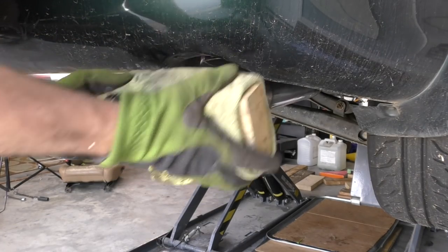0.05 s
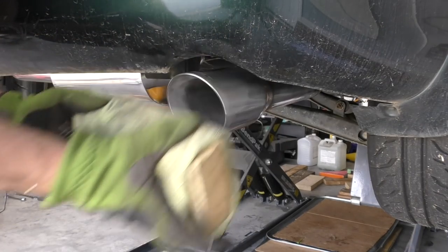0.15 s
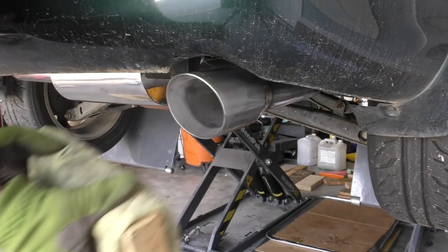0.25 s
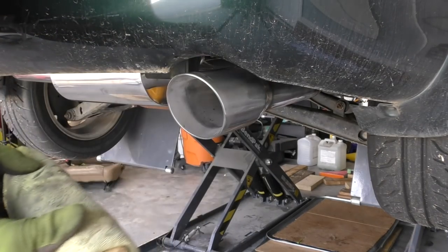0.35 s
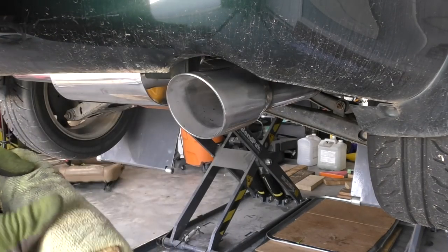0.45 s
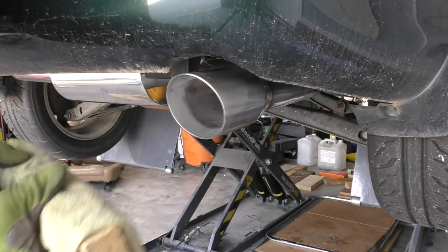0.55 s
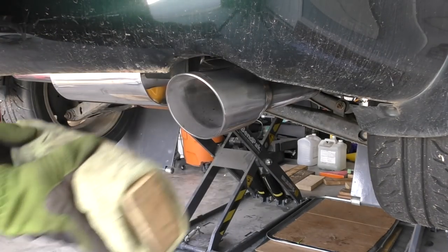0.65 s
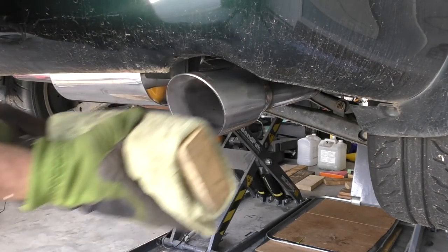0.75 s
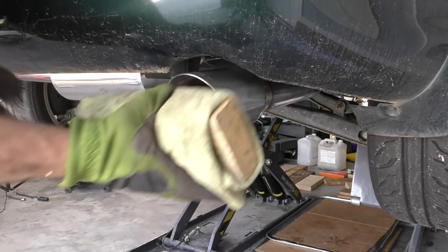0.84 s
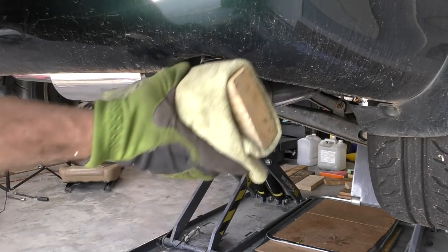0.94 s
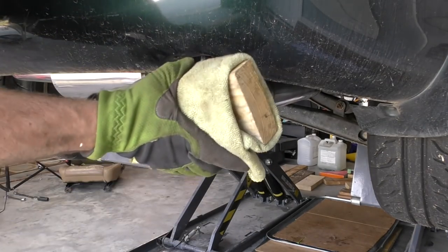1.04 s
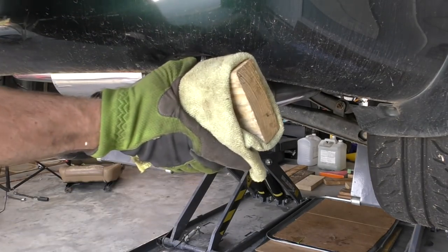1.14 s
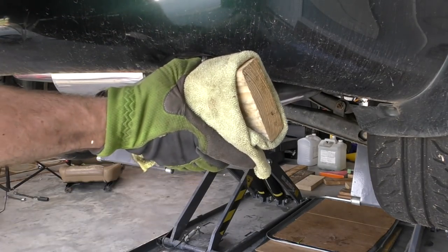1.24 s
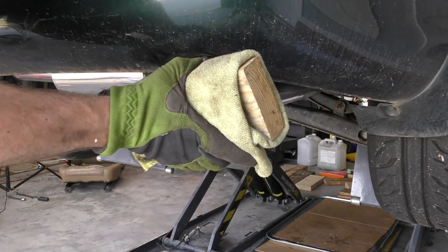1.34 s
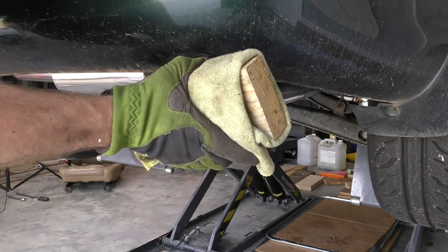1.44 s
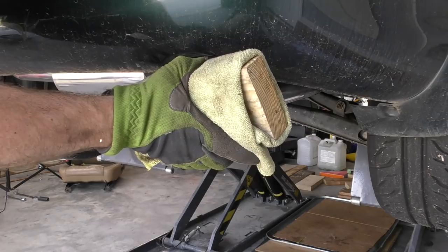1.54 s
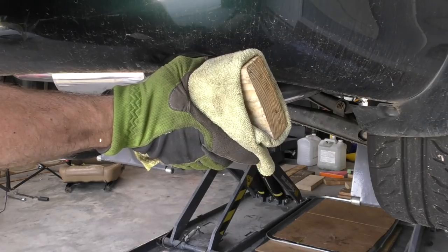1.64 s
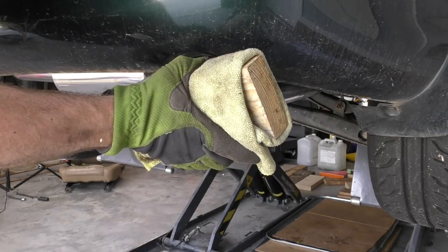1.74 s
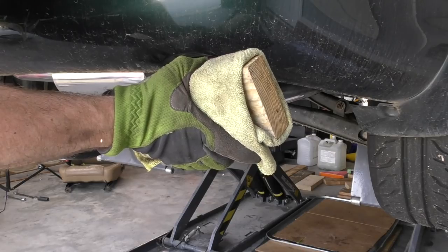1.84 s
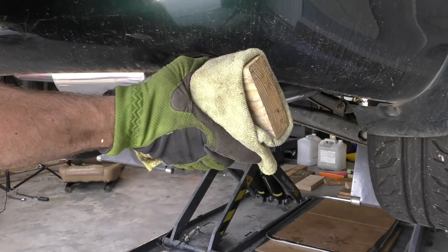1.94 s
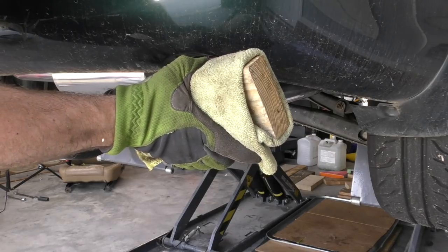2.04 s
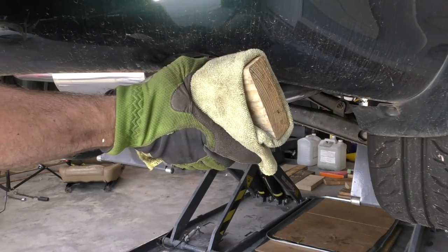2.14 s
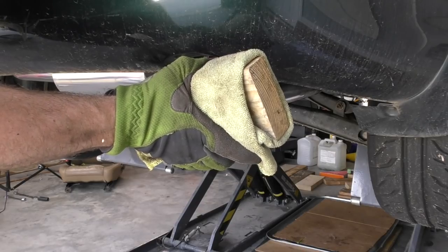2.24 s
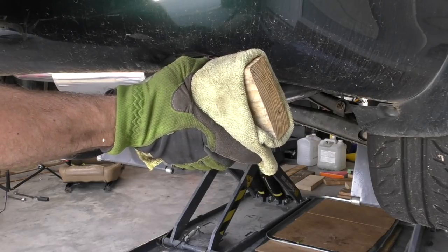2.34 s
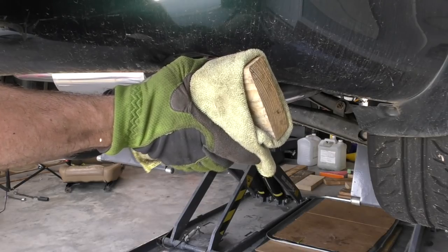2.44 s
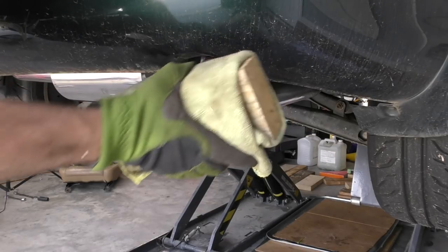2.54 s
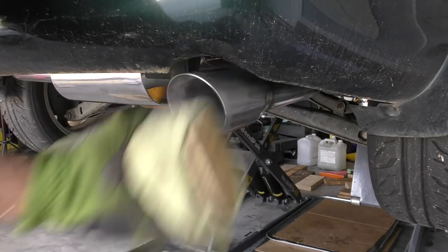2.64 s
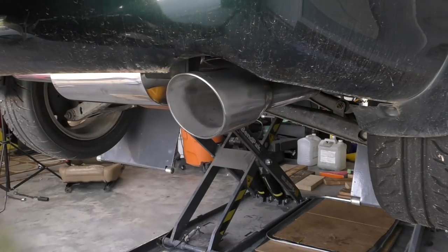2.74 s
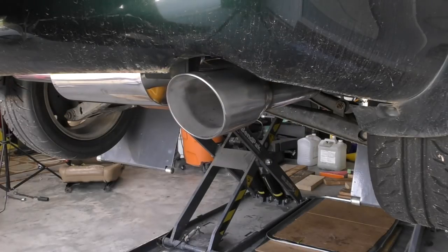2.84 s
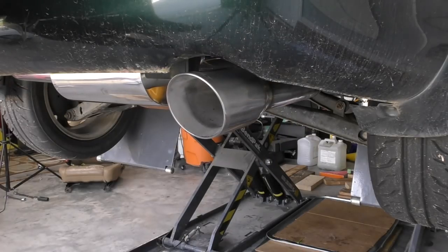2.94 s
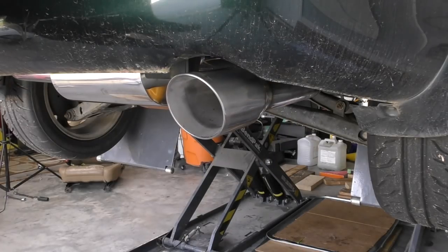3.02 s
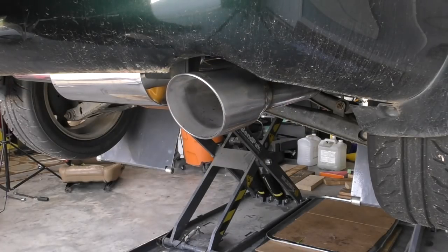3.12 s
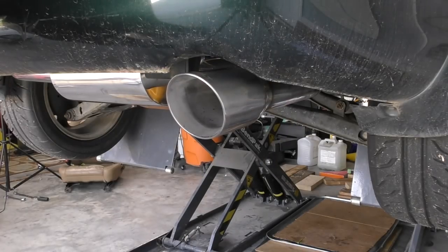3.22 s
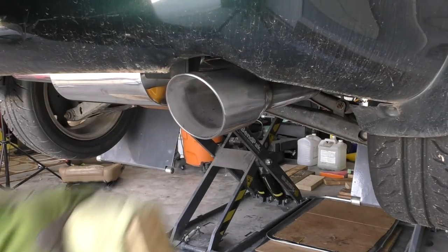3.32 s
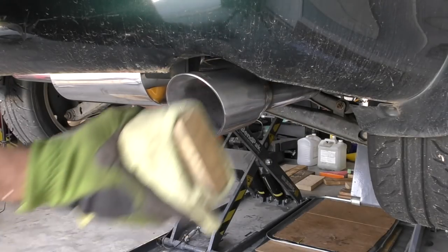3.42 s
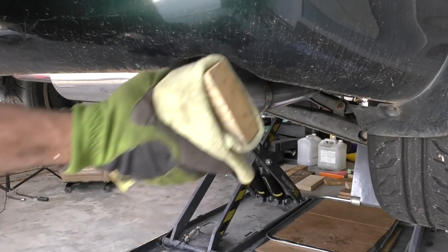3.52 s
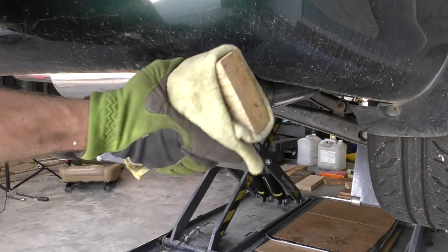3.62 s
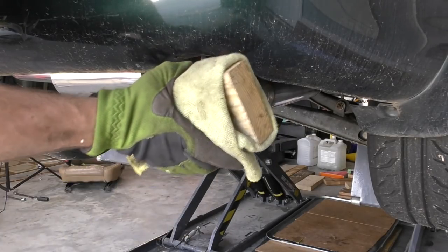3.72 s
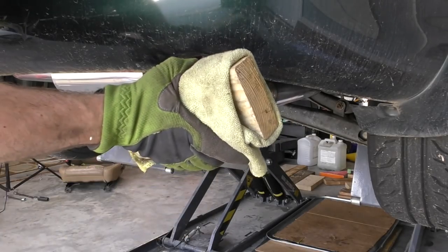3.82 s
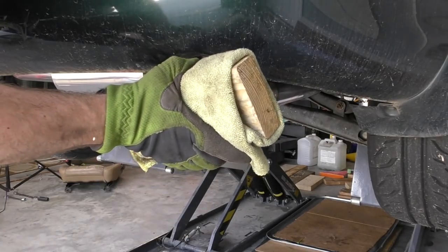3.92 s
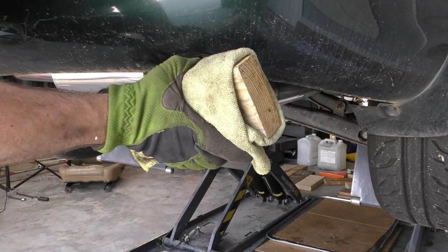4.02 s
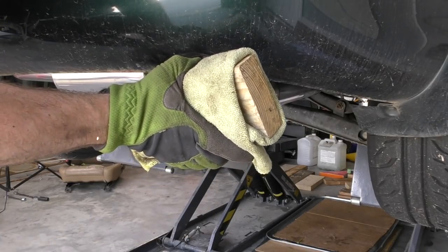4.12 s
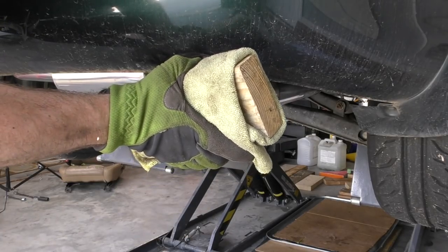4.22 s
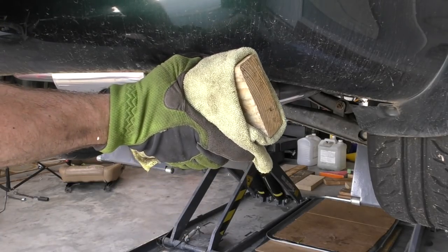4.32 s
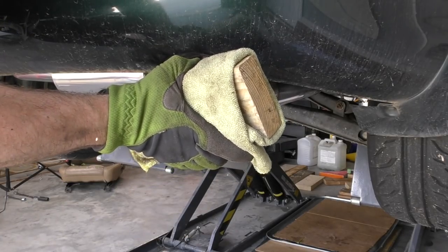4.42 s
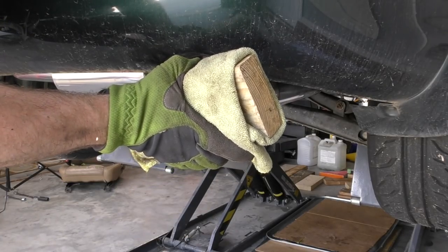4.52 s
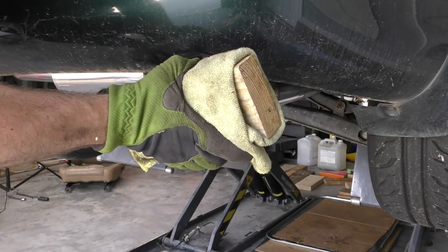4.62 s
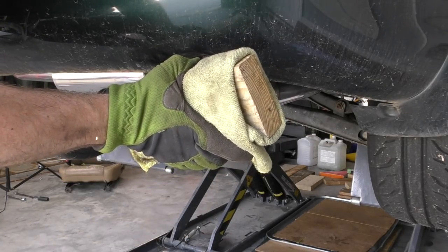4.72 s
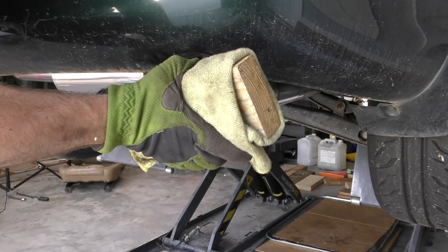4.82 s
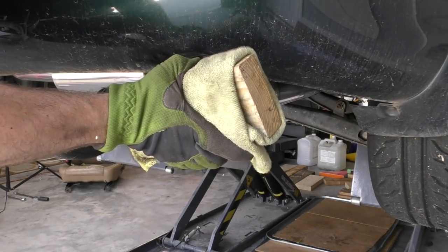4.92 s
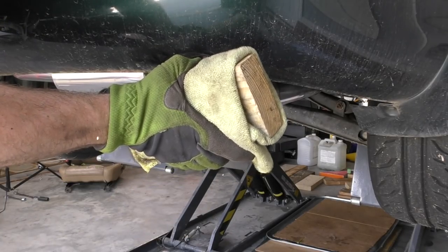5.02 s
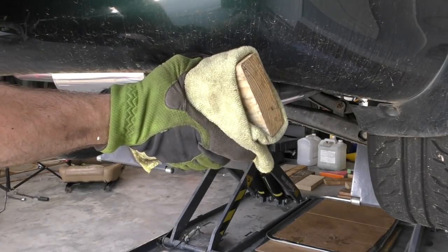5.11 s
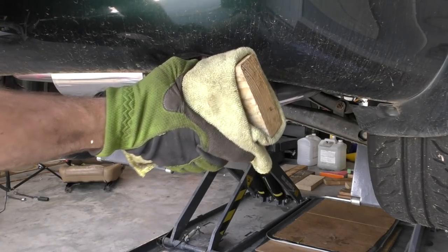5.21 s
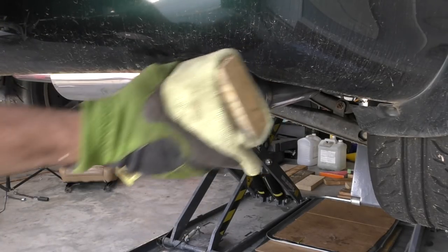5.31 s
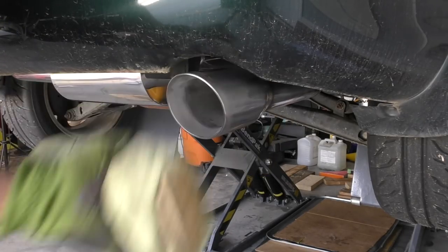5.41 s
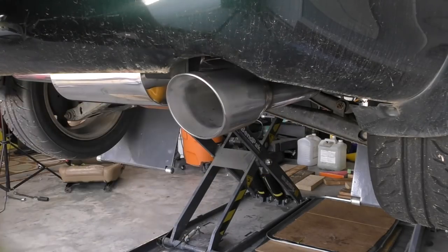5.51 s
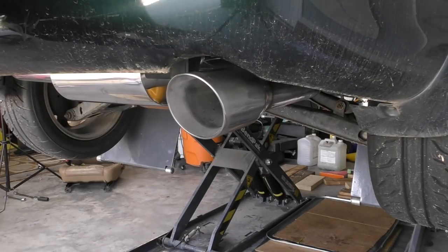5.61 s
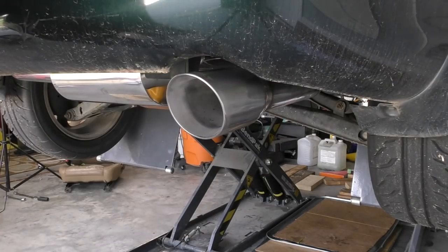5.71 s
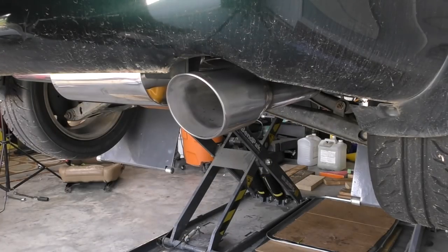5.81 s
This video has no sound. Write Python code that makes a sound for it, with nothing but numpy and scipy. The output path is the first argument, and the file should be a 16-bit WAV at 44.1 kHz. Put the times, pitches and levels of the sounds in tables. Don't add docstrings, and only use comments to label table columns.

```python
import sys
import numpy as np
from scipy import signal
from scipy.fft import rfft, irfft, next_fast_len
from scipy.io import wavfile
from scipy.ndimage import map_coordinates

SR = 44100
rng = np.random.default_rng(int(sys.argv[2]) if len(sys.argv) > 2 else 0)


def invert_db(level):
    return 10 ** (np.asarray(level, dtype=float) / 20)


def to_wav(sig):
    pcm = np.clip(np.atleast_2d(sig), -1, 1) * 32767
    pcm = np.round(pcm).astype(np.int16)
    wavfile.write(sys.argv[1], SR, pcm.T)


N = 258426
CYCLES_PER_S = 8.3
WIDE_MM = 5


def unit(x):
    return x / np.sqrt(np.mean(x ** 2) + 1e-20)


def along(points, hz):
    f, v = np.transpose(points)
    return np.interp(np.log(hz + 1), np.log(f + 1), v)


def curves(rows):
    s, *cols = np.transpose(rows)
    return [np.interp(np.arange(N) / SR, s, c) for c in cols]


def wobble(rate):
    knots = rng.standard_normal(int(N * rate / SR) + 4)
    return map_coordinates(knots, [np.arange(N) * rate / SR])


def filtered(x, response):
    m = 2 * next_fast_len(len(x))
    return irfft(rfft(x, m) * response(np.fft.rfftfreq(m, 1 / SR)), m)[:len(x)]


def low_pass(x, edge_hz, power):
    return filtered(x, lambda hz: 1 / (1 + (hz / edge_hz) ** power))


def bell(hz, centre_hz, width_hz):
    return 1 / (1 + (2 * (hz - centre_hz) / width_hz) ** 2)


def causal(spectrum):
    def response(hz):
        cepstrum = irfft(np.log(invert_db(along(spectrum, hz))))
        cepstrum[1:len(hz) - 1] *= 2
        return np.exp(rfft(cepstrum[:len(hz)], len(cepstrum)))
    return response


def noise(spectrum, size=N):
    return unit(filtered(rng.standard_normal(size), lambda hz: invert_db(along(spectrum, hz))))


# time in seconds, engine cycles completed.
CRANK_TURNS = [(-.1, -1.0), (.18, 1.325), (.4, 3.159), (.65, 5.242), (.87, 7.068), (2.68, 21.9),
               (2.95, 24.145), (3.25, 26.639), (3.52, 28.874), (5.4, 44.217), (5.6, 45.86), (5.79, 47.422),
               (6.0, 49.15)]


def pulses(count, offset, scatter_db):
    s, cycles = np.transpose(CRANK_TURNS)
    angle = np.arange(-9 * count, 50 * count) / count + offset
    earlier = s[0] + (angle - cycles[0]) / CYCLES_PER_S
    when = np.where(angle < cycles[0], earlier, np.interp(angle, cycles, s))
    at = np.round((when + 1) * SR).astype(int)
    size = invert_db(scatter_db * rng.standard_normal(len(at))) * SR / (2 * CYCLES_PER_S * count)
    keep = (at >= 0) & (at < N + SR)
    return np.bincount(at[keep], size[keep], N + SR)


# start in seconds, gap torn open at once in mm, time to clear the rim in seconds.
PULLS_OFF = [
    (0.038, 3.47, 0.027),
    (2.511, 3.29, 0.16),
    (5.216, 2.39, 0.13),
]
# touch in seconds, squeezing of the cloth in seconds.
PRESSES_ON = [
    (0.953, 0.041),
    (3.591, 0.072),
]
# time in seconds, gap in mm, length in seconds.
SEAL_SLIPS = [
    (0.025, 1.1, .03),
    (1.22, 0.64, 0.028),
    (2.479, 1.3, 0.014),
    (2.302, 0.33, 0.4),
    (4.846, .55, 0.32),
    (5.194, 0.57, 0.035),
]


def gap_mm():
    tear_s, touch_s, seal_s, settle_s = .025, 0.024, 0.023, 0.23
    t = np.arange(N) / SR
    step = lambda s, span: np.clip((t - s) / span, 0, 1)
    gap = np.zeros(N)
    for s, torn, clear in PULLS_OFF:
        gap += torn * step(s, tear_s) + (WIDE_MM - torn) * step(s + tear_s, clear)
    for s, squeeze in PRESSES_ON:
        squeezed = s + touch_s + squeeze
        gap -= (WIDE_MM - 3) * step(s, touch_s)
        gap -= step(s + touch_s, squeeze)
        gap -= step(squeezed, seal_s)
        gap -= 1 - np.exp(-np.clip(t - squeezed - seal_s, 0, None) / settle_s)
    for s, mm, span in SEAL_SLIPS:
        gap += mm * np.exp(-((t - s) / span) ** 2)
    return np.clip(gap, 0, WIDE_MM)


# frequency in Hz, level in dB.
EVEN_RING = [(15, -65), (33, -45), (66, -38), (100, -32.5), (107, -16), (114, -32.5), (135, -32.5),
             (166, -21.5), (199, -39.5), (226, -11), (234, -19.5), (250, -40), (266, -34), (299, -47),
             (332, -42), (430, -53), (1500, -130)]
# frequency in Hz, level in dB.
ODD_RING = [(20, -78), (140, -55), (160, -38.5), (175, -36.5), (200, -37.5), (221, -30), (226, -21),
            (234, -32), (242, -50), (280, -60), (340, -56), (425, -54), (500, -60), (1500, -130)]
# frequency in Hz, level in dB.
BARK_RING = [(20, -110), (270, -82), (305, -55.5), (325, -63.5), (345, -54.5), (425, -54), (500, -63),
             (600, -73), (1500, -130)]
CYLINDER_EXCESS = [.6, -0.26, -0.76, .9]


def pipe_drone():
    even = -filtered(pulses(count=4, offset=.114, scatter_db=.15), causal(EVEN_RING))
    odd = filtered(pulses(count=1, offset=.259, scatter_db=.5), causal(ODD_RING))
    uneven = sum(more * pulses(count=1, offset=.114 + k / 4, scatter_db=1)
                 for k, more in enumerate(CYLINDER_EXCESS))
    t60_s = .15
    baffles = rng.standard_normal(SR // 5) * invert_db(-60 * np.arange(SR // 5) / SR / t60_s)
    scattered = signal.fftconvolve(uneven, baffles / np.linalg.norm(baffles))[:len(uneven)]
    pipe = even + low_pass(odd, 290, 6) + filtered(scattered, causal(BARK_RING))
    return filtered(pipe, lambda hz: invert_db(-7 * np.exp(-((hz - 199) / 5) ** 2)))


# gap in mm, thud in dB, lower drone in dB, upper drone in dB.
BLOCK_CHOKE = [(0, -36.5, -51.5, -58), (.5, -31.5, -37.5, -55), (1, -18.5, -32.5, -44), (2, -12, -9.5, -23),
               (3, -7, -6.5, -27.5), (4, -0.5, -1.5, -4.5), (5, -0.5, -1, 2)]
# frequency in Hz, level in dB per Hz.
GAS_ROAR = [(60, -39), (180, -28), (280, -6), (430, -6), (560, -5), (720, -12.5), (900, -27), (1600, -27),
            (2650, -29), (6200, -36), (12000, -74)]


def exhaust():
    pipe = pipe_drone()
    thud, below = low_pass(pipe, 147, 24)[SR:], low_pass(pipe, 196, 24)[SR:]
    mm, *levels = np.transpose(BLOCK_CHOKE)
    gap = gap_mm()
    thud_db, lower_db, upper_db = [np.interp(gap, mm, db) for db in levels]
    tones = invert_db(thud_db) * thud + invert_db(lower_db) * (below - thud) + invert_db(upper_db) * (pipe[SR:] - below)

    steep = filtered(tones ** 2, lambda hz: 1j / (1 + (300 / (hz + 1)) ** 8) / (1 + (hz / 430) ** 6))
    deepest = low_pass(tones, 80, 8)
    voiced = tones - deepest + invert_db(0.25 * thud_db) * deepest

    turn = 2 * np.pi * curves(CRANK_TURNS)[0]
    gush_db = 0.99 * np.cos(4 * turn - .6 * np.pi) + 2.0 * np.cos(turn) + 1.5 * wobble(8.5)
    roar_db = -51 + .5 * upper_db + 0.45 * thud_db
    return voiced - 0.37 * steep + invert_db(roar_db + gush_db) * noise(GAS_ROAR)


# peak in seconds, level in dB, fall in seconds, edge tone in Hz.
GAS_PUFFS = [(.045, -46, 0.025, 4140), (.047, -40, 0.013, 11300), (0.063, -39, 0.0091, 9000),
             (.068, -32, 0.0062, 3000), (.941, -39.5, 0.0054, 1070), (.965, -48, 0.021, 697),
             (2.473, -52, 0.094, 7780), (2.506, -31.5, 0.018, 2883), (2.527, -16.5, 0.013, 424),
             (2.558, -24, 0.018, 1510), (2.587, -39, .02, 1852), (3.585, -47.5, .013, 840),
             (3.605, -44.5, 0.028, 780), (5.204, -58, .016, 11200), (5.217, -40, .011, 5590),
             (5.238, -23, 0.01, 10510), (5.269, -23.5, .01, 10340), (5.298, -29, 0.011, 2190),
             (5.331, -36, 0.0045, 897)]
# frequency in Hz, level in dB per Hz.
THIN_JET = [(600, -24), (1500, -15), (3000, -2), (4400, -0.5), (6100, -2), (7600, -4), (10500, -5.5),
            (13400, -10), (15700, -12)]
# frequency in Hz, level in dB per Hz.
WIDE_JET = [(150, -16), (304, -1), (575, -17), (690, -5), (800, -12.5), (1150, -14.5), (1500, -18.5),
            (4900, -25), (10000, -36), (15600, -48)]


def puffs():
    rise_s, dull_gap_mm = 0.0063, 3.38
    gas, t, gap = np.zeros(N), np.arange(-2048, 6144) / SR, gap_mm()
    for s, db, fall_s, edge_hz in GAS_PUFFS:
        surge = invert_db(db) * np.exp(-np.abs(t) / np.where(t < 0, rise_s, fall_s))
        share = np.clip(gap[round(s * SR)] / dull_gap_mm, 0, 1)
        sharp = (1 - share) ** 0.71 * noise(THIN_JET, size=len(t))
        dull = np.sqrt(share) * noise(WIDE_JET, size=len(t))
        jet = unit(filtered(sharp + dull, lambda hz: invert_db(10 * bell(hz, edge_hz, .15 * edge_hz))))
        at = round(s * SR) + np.round(t * SR).astype(int)
        gas[at[at >= 0]] += (surge * jet)[at >= 0]
    return invert_db(1.8 * wobble(350)) * gas


# frequency in Hz, level in dB per Hz.
BAY_WHIRR = [(50, -45), (95, -15.5), (168, -8.5), (196, -11.5), (342, -2.5), (458, -11.5), (585, -10.5),
             (639, -18.5), (699, -11), (799, -18), (1560, -15), (1870, -15.5), (10500, -33.5), (15600, -53)]
# frequency in Hz, width in Hz, lift in dB.
PANEL_TONES = [(333, 36, -0.5), (500, 11, 4.5), (1146, 38, 8), (1248, 21, 9), (1410, 75, 3),
               (1634, 49, 6.5), (2410, 40, 0.5)]
# time in seconds, level in dB.
ARM_SHADE = [(0.0, -59.5), (0.78, -58.5), (1.73, -63.5), (2.15, -64), (2.51, -62), (2.66, -58.5),
             (3.39, -57), (4.29, -63.5), (5.22, -64), (5.4, -59), (5.86, -58)]


def engine_bay():
    lift = lambda hz: invert_db(sum(db * bell(hz, centre, width) for centre, width, db in PANEL_TONES))
    whirr = unit(filtered(noise(BAY_WHIRR), lift))
    level_db = 5 + curves(ARM_SHADE)[0]
    return invert_db(level_db + 0.71 * wobble(1.7) + 0.33 * wobble(40)) * whirr


# frequency in Hz, time to fall 60 dB in seconds.
GARAGE_T60 = [(200, 0.21), (2000, 0.22), (10000, 0.078)]


def garage(x):
    hz, t, z = signal.stft(rng.standard_normal(SR // 2), SR, nperseg=256)
    fading = z * invert_db(-60 * t / along(GARAGE_T60, hz)[:, None])
    tail = signal.istft(fading, SR, nperseg=256)[1]
    late = np.pad(x, (500, 0))
    return signal.fftconvolve(late, tail / np.linalg.norm(tail))[:N]


# frequency in Hz, level in dB per Hz.
MIC_HISS = [(2000, -28), (8000, -5.5), (13000, 0), (15600, -2)]


def mic_hiss():
    return invert_db(-83) * noise(MIC_HISS)


# time in seconds, level in dB.
IDLE_EFFORT = [(0, 1.3), (1, 1), (2.6, 0.47), (3.6, -0.66), (5.86, 0)]


def scene():
    gas = puffs()
    note = invert_db(curves(IDLE_EFFORT)[0]) * exhaust()
    echo = garage(invert_db(-21.5) * gas + invert_db(-28.5) * note)
    return (note + gas + echo + engine_bay() + mic_hiss())[None]


def band_limit(x):
    return signal.sosfilt(signal.butter(12, 15720, fs=SR, output="sos"), x)


def record(dry):
    return band_limit(dry)


dry = scene()
out = record(dry)
to_wav(out)
```